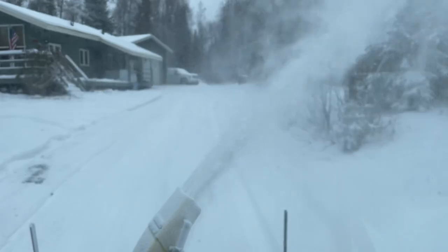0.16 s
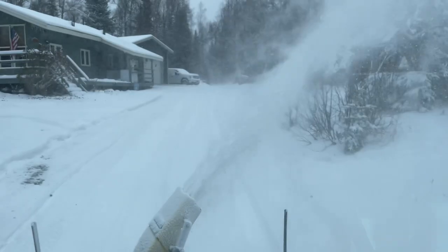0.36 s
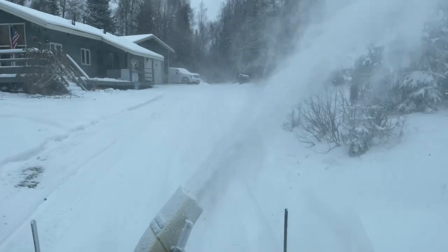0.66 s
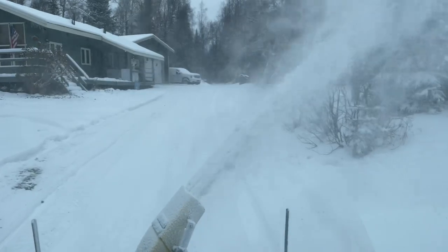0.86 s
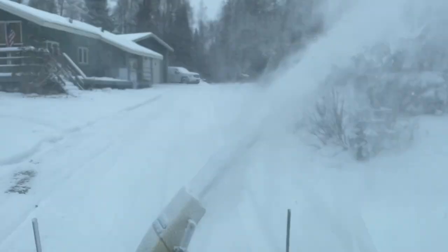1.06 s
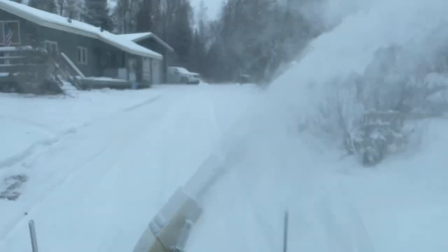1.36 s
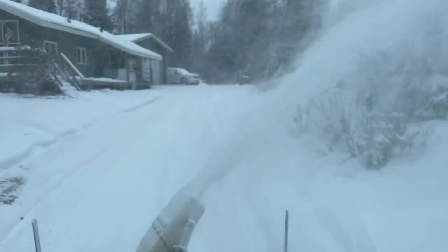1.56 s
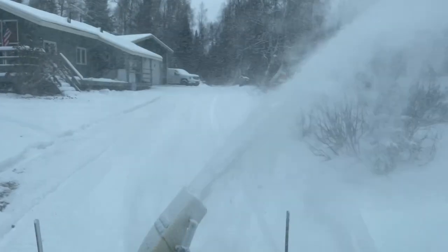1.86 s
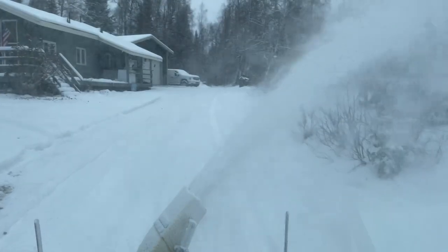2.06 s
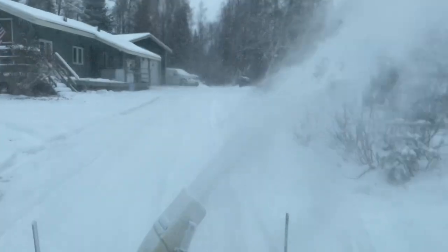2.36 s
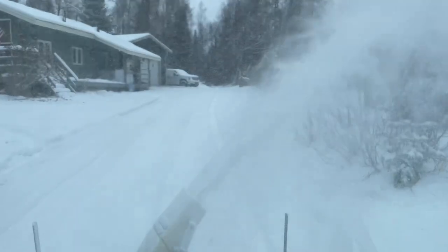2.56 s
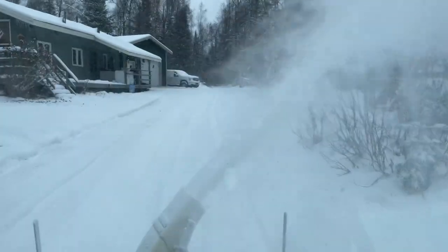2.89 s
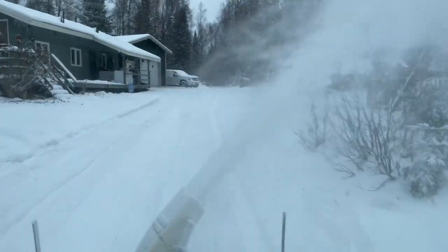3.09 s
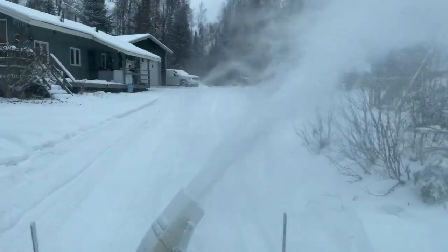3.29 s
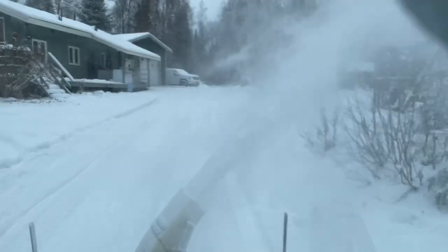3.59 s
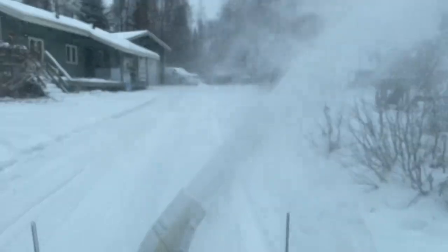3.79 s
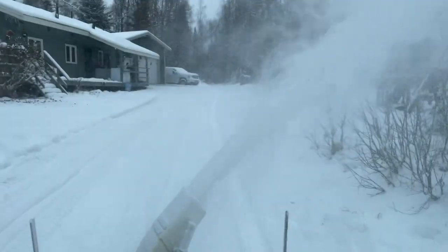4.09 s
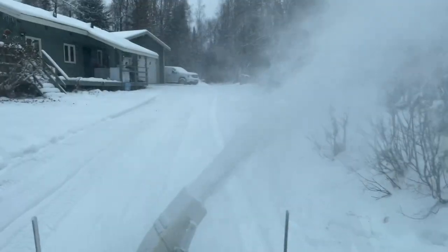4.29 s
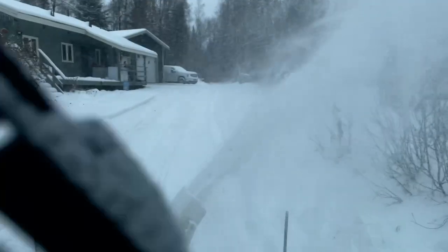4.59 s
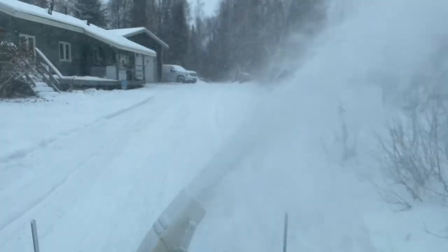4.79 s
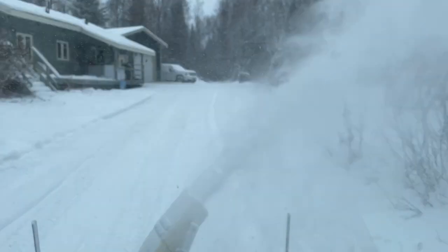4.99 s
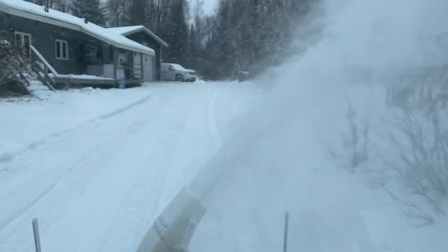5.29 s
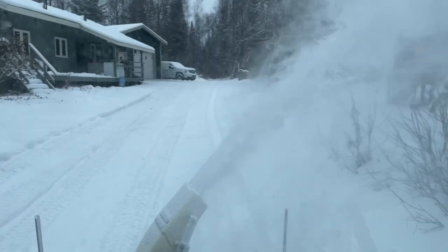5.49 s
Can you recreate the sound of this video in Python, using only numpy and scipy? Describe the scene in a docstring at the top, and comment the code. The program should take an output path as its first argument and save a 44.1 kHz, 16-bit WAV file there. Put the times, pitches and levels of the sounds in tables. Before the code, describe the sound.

Inside a small tractor cab, a diesel engine runs at constant high speed while a front snowblower throws snow. A dense, rough roar and airy rush dominate from the start, over lurching bass rumble, a beating mid-low drone and a thin wavering whine. Occasional sharp metallic ticks and dull bumps appear. The bass eases after about four and a half seconds. Close, wide stereo microphone; no pauses.

```python
"""Snowblower tractor, inside the cab

A three-cylinder diesel drives a front snowblower at full speed: engine orders and whine are drifting sines.
They stand over the roar of snow in auger, impeller and chute, made of noise swollen by random lumps.
The blower housing drones on two beating tones; cracks of noise knock now and then, short sines bump dully.
Bass noise shakes the cab and eases near the end. The treble's stereo width changes from band to band."""
import sys
import numpy as np
from scipy import signal
from scipy.fft import rfft, irfft, next_fast_len
from scipy.io import wavfile
from scipy.ndimage import uniform_filter1d, map_coordinates

SR = 44100
rng = np.random.default_rng(int(sys.argv[2]) if len(sys.argv) > 2 else 0)


def to_wav(s):
    """Save 16-bit WAV."""
    ch = np.atleast_2d(s).T  # columns
    pcm = np.round(np.clip(ch, -1, 1) * 32767)  # PCM
    wavfile.write(sys.argv[1], SR, pcm.astype(np.int16))


N = 249165
TIME = np.arange(N) / SR


def amp(db):
    """Gain of a level in dB."""
    return 10 ** (np.asarray(db) / 20)


def unit(x):
    """Scaled to rms 1."""
    return x / np.sqrt(np.mean(x ** 2) + 1e-20)


def along(points, hz):
    """Reads (freq_hz, value) points on a log frequency axis."""
    freq_hz, value = np.transpose(points)
    return np.interp(np.log(hz + 1), np.log(freq_hz + 1), value)


def curves(rows):
    """One value per sample for each column after the time."""
    time_s, *columns = np.transpose(rows)
    return [np.interp(TIME, time_s, column) for column in columns]


def wobble(rate):
    """A smooth random curve, rate knots a second."""
    coarse = TIME[::16]
    knots = rng.standard_normal(int(N * rate / SR) + 4)
    return np.interp(TIME, coarse, map_coordinates(knots, [coarse * rate]))


def swells(rows, half_s):
    """Gain of bell-shaped swells at (crest_s, level_db), added in power."""
    coarse = TIME[::32]
    power = sum(amp(2 * db) * np.exp(-((coarse - crest_s) / half_s) ** 2) for crest_s, db in rows)
    return np.sqrt(np.interp(TIME, coarse, power))


def even(x, seconds):
    """Levels out the sound's own slow swells, to about rms 1 in the mean of both sides."""
    power = uniform_filter1d(x.mean(axis=0) ** 2, int(seconds * SR))
    return x / np.sqrt(np.abs(power) + 1e-9)


def filtered(x, response):
    """Filters x by a complex response of frequency."""
    size = next_fast_len(N + 8192)
    return irfft(rfft(x, size) * response(np.fft.rfftfreq(size, 1 / SR)), size)[..., :N]


# Phase between the ports below the treble: freq_hz, left_leads_rad [radians]
LEAD = [(30, 0.5), (400, -1.52), (600, 0.26), (800, 0.27), (1250, 2), (1500, 3.5), (1900, 7.5), (2600, 6.5),
        (5500, 6), (6300, 5), (7000, 8.5)]
# Treble stereo image: freq_hz, likeness [0-1], left_leads [half turns]
TREBLE = [(7650, 1, 1), (8800, 1, 1), (9600, .7, .5), (10400, 1, 0), (12400, 1, 0), (13100, .5, -.4),
          (13800, 1, -1)]


def lead(hz):
    """Radians by which the left port leads the right."""
    return along(LEAD + [(freq_hz, np.pi * turns) for freq_hz, _, turns in TREBLE], hz)


# How alike the ports sound below the treble: freq_hz, likeness [0-1]
ALIKE = [(30, 0.6), (75, 0.78), (130, 0.38), (300, 0.55), (500, 0), (900, 0.32), (1600, 0), (2600, 0.61),
         (4000, 0.36), (6000, 0.53)]
# Balance below the treble: freq_hz, left_minus_right_db
PAN = [(100, 0), (800, 0), (1500, -2.5), (2200, 1), (3500, 1.5), (6000, 2)]


def ports(hz):
    """Mixes a common and an unrelated sound into left and right, with phase and balance set by band."""
    likeness = along(ALIKE + [row[:2] for row in TREBLE], hz)
    turn = np.arccos(np.clip(likeness, 0, 1)) / 2
    pan_db = along(PAN + [(TREBLE[0][0], 0)], hz)
    half = amp(pan_db / 2) * np.exp(.5j * lead(hz))  # half of the phase and balance goes to each side
    left = [np.cos(turn) * half, np.sin(turn) * half]
    right = [np.cos(turn) / half, -np.sin(turn) / half]
    return np.array([left, right])


# Cab resonances: centre_hz, width_hz, level_db
PANELS = [(376, 40, -3), (718, 30, -2.5), (770, 50, 3.3), (1085, 25, 3), (1190, 50, 3), (1305, 50, 4),
          (1490, 90, -2), (1592, 40, 4), (1722, 25, 5), (1768, 25, -3.5), (1800, 50, 3.5), (2012, 30, 7),
          (2130, 60, -3.5), (2313, 18, 5), (2475, 40, 3), (2850, 80, -2), (2981, 35, 5), (3831, 50, 3),
          (3975, 90, -2.5), (4090, 60, 2.5), (4930, 200, -2), (5110, 90, 2.5), (5370, 90, 3),
          (6450, 60, 3.5), (6760, 60, 3)]


def cab(hz):
    """Panels and glass lift or damp narrow bands of the noise."""
    return amp(sum(db / (1 + (2 * (hz - centre) / width) ** 2) for centre, width, db in PANELS))


def noise(spectrum, swell, patchy_db):
    """Stereo noise with short random patches, moved by swell; the mean of both sides has rms 1."""
    grains = signal.stft(rng.standard_normal((2, N)), nperseg=256)[2]
    field = rng.standard_normal(grains.shape[1:])
    field = uniform_filter1d(uniform_filter1d(field, size=3, axis=0), size=5, axis=1)
    field = field - uniform_filter1d(field, size=40, axis=1)  # patches last tens of ms, no longer
    patchy = signal.istft(grains * amp(patchy_db * unit(field)), nperseg=256)[1][:, :N]
    shape = lambda hz: amp(along(spectrum, hz)) * cab(hz) * ports(hz)
    out = filtered(swell * patchy, shape).sum(axis=1)
    return out / np.sqrt(np.mean(out.mean(axis=0) ** 2))


def tone(hz, db, pan_db, jitter):
    """A sine unsteady by jitter in Hz, with its own phase at each port."""
    phase = 2 * np.pi * np.cumsum(hz + jitter * wobble(6.025)) / SR + rng.uniform(0, 2 * np.pi)
    lag = lead(np.mean(hz)) / 2
    left = amp(pan_db / 2) * np.sin(phase + lag)
    right = amp(-pan_db / 2) * np.sin(phase - lag)
    return np.sqrt(2) * amp(db) * np.array([left, right])


def lumps(rate, rise_s, fall_s):
    """Lumps arrive at random, each a quick rise and a slower fall; centred near 0, rms 1."""
    hits = (rng.random(N) < rate / SR) * rng.uniform(0.6, 1, N)
    t = TIME[:SR // 4]
    x = signal.fftconvolve(hits, np.exp(-t / fall_s) - np.exp(-t / rise_s))[:N]
    x = unit(x - uniform_filter1d(x, SR // 10))
    return unit(np.tanh(x / 2))  # piles of lumps level off


# Engine cycles (two shaft turns, each cylinder fires once): time_s, rate_hz [cycles a second]
SPEED = [(0, 24.885), (.9, 24.875), (1.3, 24.843), (3.5, 24.843), (3.8, 24.875), (4.9, 24.878),
         (5.65, 24.91)]


def cycles(since_s):
    """Angle of the engine cycle in radians, zero at since_s."""
    angle = 2 * np.pi * np.cumsum(curves(SPEED)[0]) / SR
    return angle - angle[round(since_s * SR)]


# Cab rumble, a base level that growl and low engine orders follow too: time_s, level_db
RUMBLE = [(.05, -19), (.75, -17.5), (1.05, -16), (1.7, -19), (2.15, -16), (2.7, -18), (3.3, -18.5),
          (4.3, -17.5), (4.47, -28), (5.64, -28.5)]
# The cab lurches in the bass: crest_s, level_db [rms, before the throb]
LURCHES = [(0.059, -16.5), (0.177, -12), (0.331, -14), (0.472, -22), (0.544, -21), (0.955, -18),
           (0.99, -18), (1.035, -14.5), (1.186, -13), (1.355, -12.5), (1.54, -8), (1.667, -12.5),
           (1.819, -20), (2.168, -21), (2.483, -15.5), (2.63, -17.5), (2.882, -14.5), (3.125, -13),
           (3.279, -18), (3.376, -19), (3.456, -15), (3.542, -13), (3.644, -21), (3.769, -19.5),
           (3.853, -18), (4.161, -16.5), (4.308, -13), (4.746, -22), (4.986, -32), (5.107, -27),
           (5.308, -26), (5.415, -39), (5.508, -29)]
# Rumble colour before the cab: freq_hz, density_db [relative dB per Hz]
LOW = [(15, -55), (25, -46), (48, -1), (75, -0.5), (100, -9), (135, -15.5), (180, -12), (300, -52),
       (600, -68.5)]
LURCH_S = 0.013  # half length of one swell
CALM_DB = -1.5  # between lurches, against the base level
THROB, THROB_CREST_S = .28, .0325  # depth 0-1, first crest in s


def rumble():
    """Dense bass that shakes the cab in uneven lurches and throbs with the engine cycle."""
    calm = amp(curves(RUMBLE)[0] + CALM_DB + 1.6 * wobble(24))
    gain = np.hypot(calm, swells(LURCHES, LURCH_S))
    throb = 1 + THROB * np.cos(cycles(THROB_CREST_S))
    return gain * throb * even(noise(LOW, 1, patchy_db=0.5), seconds=0.054)


# The engine's body surges: crest_s, level_db [rms]
SURGES = [(0.113, -22), (0.238, -20), (0.415, -18), (0.553, -14), (0.598, -17), (0.764, -13),
          (1.202, -18.5), (1.465, -16.5), (1.565, -18), (1.769, -21.5), (1.982, -16.5), (2.299, -22),
          (2.664, -15), (3.079, -15.5), (3.465, -21), (3.592, -15.5), (3.703, -21), (3.952, -21),
          (4.109, -24.5), (4.44, -17.5), (4.646, -24), (4.79, -22), (4.957, -14), (5.07, -28), (5.2, -28),
          (5.38, -25.5), (5.524, -19.5)]
# Lumpy engine body before the cab: freq_hz, density_db [relative dB per Hz]
GROWL = [(60, -60), (105, -15.5), (140, -7.5), (175, 1), (205, -11), (260, -6.5), (330, -14.5), (420, -24),
         (700, -68)]
SURGE_S = 0.015  # half length of one swell
GROWL_DB, GROWL_FOLLOWS = -33.5, 1  # mean level between surges; share of the rumble's changes followed


def growl():
    """The engine's body growls in short, uneven surges, knotty with small blows; it eases with the rumble."""
    shake_db, = curves(RUMBLE)
    calm_db = GROWL_DB + GROWL_FOLLOWS * (shake_db - shake_db.mean()) + 5.1 * wobble(22.02)
    gain = np.hypot(amp(calm_db), swells(SURGES, SURGE_S))
    blows = amp(2.8 * lumps(rate=44, rise_s=0.0022, fall_s=0.0097))
    return gain * even(noise(GROWL, blows, patchy_db=0.5), seconds=0.066)


# Brief dull bumps in the roar: start_s, level_db [before rise and decay], pitch_hz
BUMPS = [(0.475, -11, 805), (2.887, -5, 900), (3.001, -6, 790), (4.175, -7, 606), (4.489, -13, 810),
         (4.731, -12, 649), (4.884, -6, 603), (4.981, -13, 655), (5.147, -11, 625)]


def bumps():
    """Brief dull bumps in the roar: short decaying sines at 600-900 Hz."""
    bump = np.zeros((2, N + SR))
    t = TIME[:SR // 8]
    for start_s, db, pitch_hz in BUMPS:
        envelope = amp(db - 60 * t / 0.031) * (1 - np.exp(-t / 0.0012))
        bump[0, round(start_s * SR):][:len(t)] += envelope * np.sin(2 * np.pi * pitch_hz * t)
    return filtered(bump[:, :N], ports).sum(axis=1)


# Bright cracks: start_s, level_db [noise burst before its band filter]
KNOCKS = [(0.6554, -24), (1.1914, -30), (1.789, -16), (1.989, -21), (2.5248, -17), (2.9648, -22),
          (2.9996, -14), (3.5141, -30), (3.699, -20), (4.596, -19)]


def knocks():
    """Hard bits strike sheet metal: short cracks of noise in a bright band."""
    crack = np.zeros((2, N + SR))
    t = TIME[:SR // 8]
    for start_s, db in KNOCKS:
        decay = amp(db - 60 * t / 0.044)
        crack[:, round(start_s * SR):][:, :len(t)] += decay * rng.standard_normal((2, len(t)))

    def band(hz, centre, width):
        """A resonant band, applied twice for steep flanks."""
        return (1j * hz * width / (centre * centre - hz * hz + 1j * hz * width + 1)) ** 2

    return filtered(crack[:, :N], lambda hz: band(hz, 2050, 2100) * ports(hz)).sum(axis=1)


# Roar of the auger: time_s, level_db [rms before its wavering]
AUGER = [(.05, -20.5), (.6, -21.5), (1.15, -21.5), (1.6, -20), (2.9, -20), (3.3, -21), (3.7, -20),
         (4.4, -20.5), (5.64, -21)]
# Snow through the impeller: time_s, level_db [rms before pulse and wavering]
FLOW = [(.05, -27.5), (1, -28), (2.1, -27.5), (3, -27.5), (3.9, -27), (4.3, -28), (5.1, -28), (5.4, -27),
        (5.64, -28)]
# Snow hissing in the chute: time_s, level_db [over the flow's mean level]
CHUTE = [(.05, -27.5), (1.1, -28.5), (1.4, -25.5), (1.7, -28), (3.5, -28.5), (3.7, -25.5), (3.85, -28),
         (4.4, -26.5), (5.2, -28), (5.64, -26)]
# Colours of auger, impeller and chute before the cab: freq_hz, density_db [relative dB per Hz]
ROAR = [(40, -23), (110, -4.5), (180, -8), (230, -3), (350, -1), (450, -4.5), (700, -7.5), (1000, -15),
        (1500, -43), (2500, -84), (6000, -120)]
RUSH = [(150, -100), (400, -60), (800, 0), (1000, -1), (1450, -5), (1900, -6), (2150, -8.5), (2550, -9.5),
        (2900, -14), (3400, -18), (4100, -19.5), (4800, -23), (5500, -22.5), (7500, -27.5), (8850, -24.5),
        (9300, -47), (11000, -63)]
HISS = [(5000, -90), (8000, -23), (8900, 9.5), (9600, 8.5), (11200, 3), (12600, 4.5), (13100, 5.5),
        (14000, 4), (15200, -2)]
SHAFT_HZ, SHAFT_CREST_S = 9.12, .025  # blower's drive shaft: turns a second, first crest of the flow


def snow():
    """The same lumps swell the auger's roar, the impeller's rush and the chute's hiss; firings chop the rush.
    The flow pulses once a shaft turn and wavers with the uneven snow."""
    lump = lumps(rate=66, rise_s=0.0035, fall_s=0.029)
    firing = np.cos(3 * cycles(0))  # three firings a cycle
    pulse = np.cos(2 * np.pi * SHAFT_HZ * (TIME - SHAFT_CREST_S))
    flow_db = curves(FLOW)[0] + 0.39 * pulse + 0.46 * wobble(19)
    mean_db = flow_db.mean()
    hiss_db = curves(CHUTE)[0] + mean_db + 0.89 * (flow_db - mean_db)  # the chute follows the flow in part
    roar = noise(ROAR, amp(0.38 * lump + 1.2 * wobble(70)), patchy_db=2.3)
    roar = even(roar, seconds=0.09)
    rush = noise(RUSH, amp(0.63 * lump + 0.16 * wobble(150) + 0.17 * firing), patchy_db=1.5)
    hiss = noise(HISS, amp(0.54 * lump + 0.68 * wobble(310)), patchy_db=3.0)
    roar_db = curves(AUGER)[0] + 0.83 * wobble(30)
    return amp(roar_db) * roar + amp(flow_db) * rush + amp(hiss_db) * hiss


# The drone's two tones: time_s, lower_db, upper_db [rms before wavering, balance and beat]
HUM = [(.05, -37, -27.5), (.62, -33, -32.5), (.85, -34, -23.5), (1.09, -32, -36), (1.33, -32, -28.5),
       (1.6, -34.5, -26.5), (2.03, -31, -29), (2.27, -41, -31), (2.75, -37, -34), (2.99, -29.5, -28),
       (3.22, -39, -33.5), (3.45, -36, -38.5), (3.69, -28, -29.5), (3.93, -34, -34), (4.15, -31.5, -32),
       (4.4, -34.5, -31), (4.85, -35, -36), (5.1, -32.5, -31), (5.6, -40, -29.5)]
# Rough band around them before the cab: freq_hz, density_db [relative dB per Hz]
DRONE = [(250, -120), (325, -40), (355, -8), (376.5, 0), (398, -8), (430, -40), (560, -120)]
HUM_MULTIPLE, HUM_GAP = 15, .1706  # lower tone and step to the upper one, in multiples of the cycle rate
HUM_CREST_S = .148  # first crest of the beat, before its wavering
CREST_DB = 2.5  # the housing rings harder at each crest of the beat
ROUGH_DB, ROUGH_BEATS = -4, .8  # noise over the upper tone in dB; share 0-1 that beats with the tones


def housing():
    """The blower housing drones on two close tones that beat about four times a second, in a rough band."""
    low_db, high_db = curves(HUM)
    angle = HUM_MULTIPLE * cycles(0) + .3 * wobble(6)
    beat = HUM_GAP * cycles(HUM_CREST_S) + .3 * wobble(8)
    lower = amp(low_db + 1.5 * wobble(6)) * np.sin(angle)
    upper = amp(high_db + 1.3 * wobble(7.9)) * np.sin(angle + beat)
    rough = even(noise(DRONE, 1, patchy_db=2.5), seconds=0.068)
    rough = amp(high_db + ROUGH_DB) * (1 + ROUGH_BEATS * np.cos(beat)) * rough
    side_db = [[-1.3], [1.1]] + CREST_DB * np.cos(beat)  # left, right
    return np.sqrt(2) * amp(side_db) * (lower + upper) + rough


# Tones of engine, pump and gears: multiple [of the cycle rate]
MULTIPLES = [6, 7, 8, 10, 14, 21, 28, 31, 39, 41, 48, 56, 70, 78.17]
# One row for each multiple: level_db [rms], left_minus_right_db, unsteadiness_db
ORDERS = [(-40, 0, 3), (-33, -1, 1.5), (-40, 2, 3), (-42, 0, 3), (-40, 0, 3), (-44, -10, 3), (-43, -9, 2),
          (-45, 7, 3), (-50, 0, 3), (-47, 6, 3), (-54, -6, 3), (-46.5, 10.5, 3), (-49, 0, 3), (-49.5, 9, 2)]
# Low orders at 2, 3 and 4 times the cycle rate: # level_db [over the rumble], left_minus_right_db,
# unsteadiness_db
BEAT = [(-13, 1, 2.5), (-10.5, 1.5, 2.5), (-15, 1, 3)]
# Pump whine: time_s, level_db [rms before its wavering]
WHINE = [(.05, -33), (.3, -31.5), (.55, -31), (.65, -37), (.78, -32.5), (1.15, -40), (1.7, -44),
         (2.28, -38), (2.4, -31), (2.55, -32), (2.85, -39), (2.97, -33.5), (3.1, -45), (3.4, -35),
         (3.98, -33.5), (4.1, -43), (4.22, -31), (4.65, -30), (4.74, -32), (4.9, -28), (5.14, -30.5),
         (5.26, -28.5), (5.64, -30)]
# Rasp around the whine before the cab: freq_hz, density_db [relative dB per Hz]
WHINE_BAND = [(450, -120), (570, -30), (597, 0), (628, -30), (750, -120)]
WHINE_MULTIPLE, RASP_DB = 24, -10  # pump strokes a cycle; rasp over the whine in dB


def engine():
    """Orders of the cycle rate share one drifting speed; the lowest rise and fall with the cab's rumble."""
    speed, = curves(SPEED)
    shake_db = uniform_filter1d(curves(RUMBLE)[0], SR // 4)
    out = np.zeros((2, N))
    for multiple, (db, pan_db, loose_db) in zip(MULTIPLES, ORDERS):
        out += tone(multiple * speed, db + loose_db * wobble(4.96), pan_db, jitter=1.06)
    for multiple, (db, pan_db, loose_db) in enumerate(BEAT, 2):
        out += tone(multiple * speed, shake_db + db + loose_db * wobble(5.4), pan_db, jitter=0.3)
    whine_db = curves(WHINE)[0] + 0.9 * wobble(35)
    whine = tone(WHINE_MULTIPLE * speed, whine_db, pan_db=-2.5, jitter=.7)
    rasp = amp(whine_db + RASP_DB) * noise(WHINE_BAND, 1, patchy_db=4.0)
    return out + whine + rasp


def scene():
    """All sources as they reach the two ports."""
    return rumble() + growl() + bumps() + knocks() + snow() + housing() + engine()


START_S, TOP_HZ = .0265, 15150  # silence before the start; band limit


def record(dry):
    """The recorder starts a moment late, rounds the highest peaks and keeps nothing above its band limit."""
    soft = dry / (1 + np.abs(dry / .97) ** 6) ** (1 / 6)
    opening = np.clip((TIME - START_S) / .0004, 0, 1)
    return filtered(soft * opening, lambda hz: hz < TOP_HZ)


dry = scene()
out = record(dry)
to_wav(out)
```